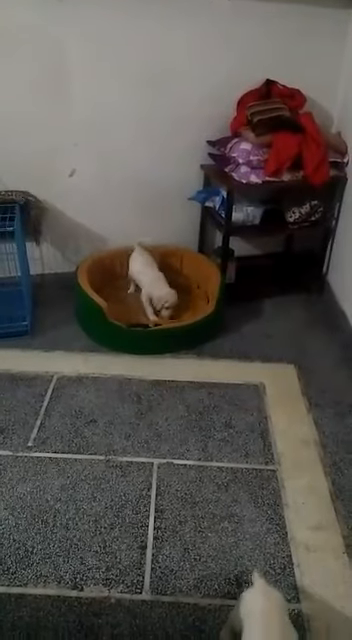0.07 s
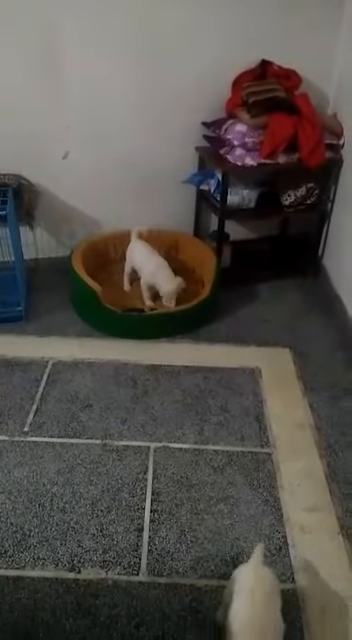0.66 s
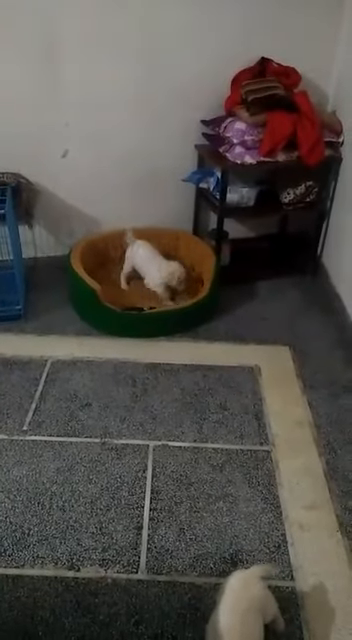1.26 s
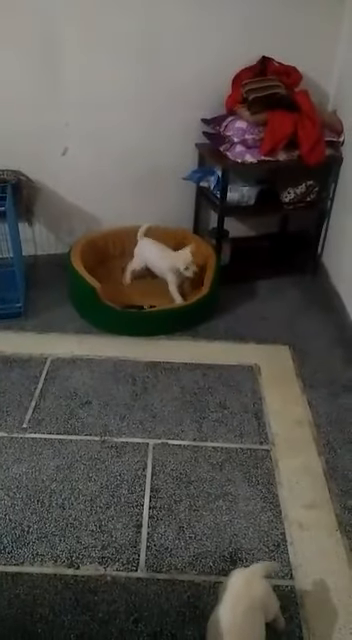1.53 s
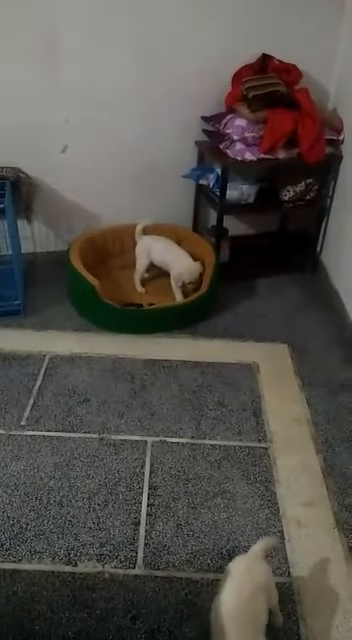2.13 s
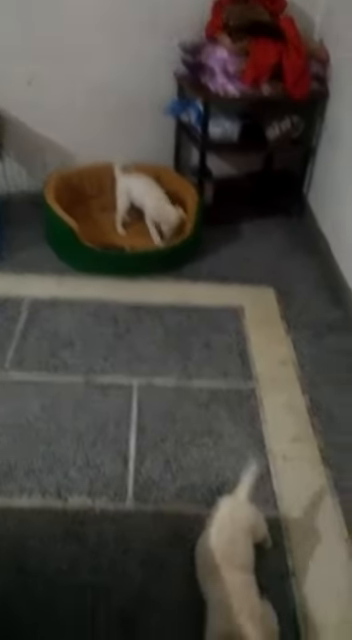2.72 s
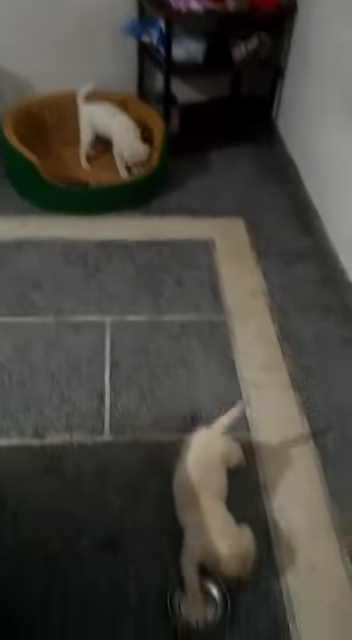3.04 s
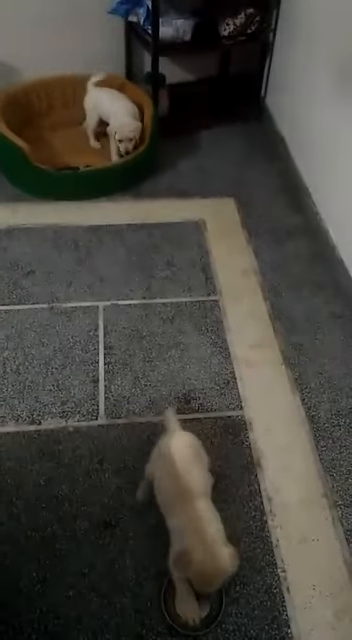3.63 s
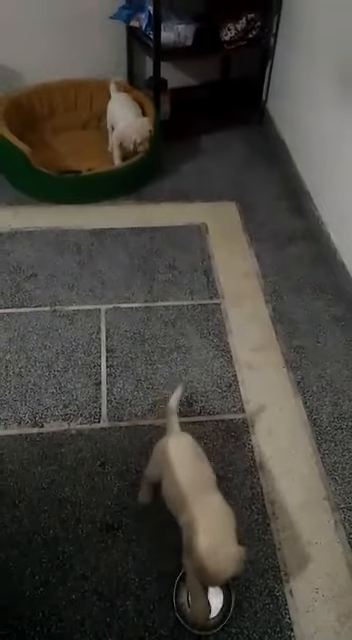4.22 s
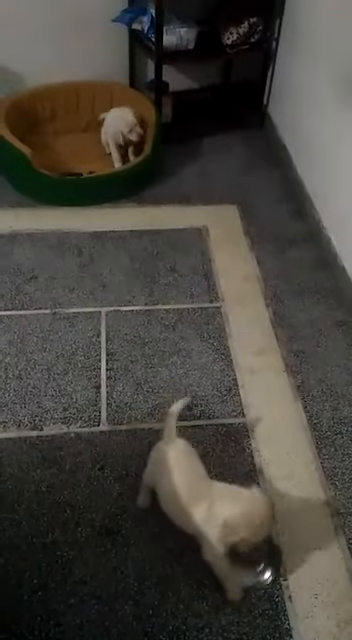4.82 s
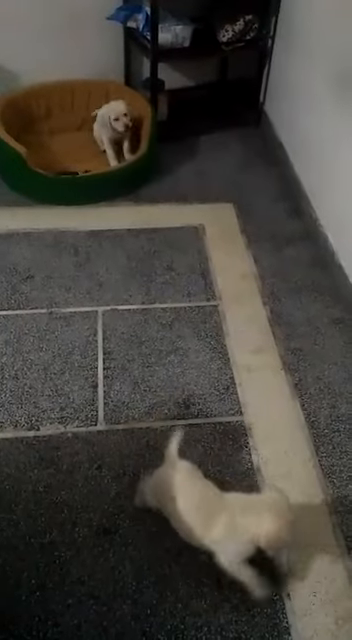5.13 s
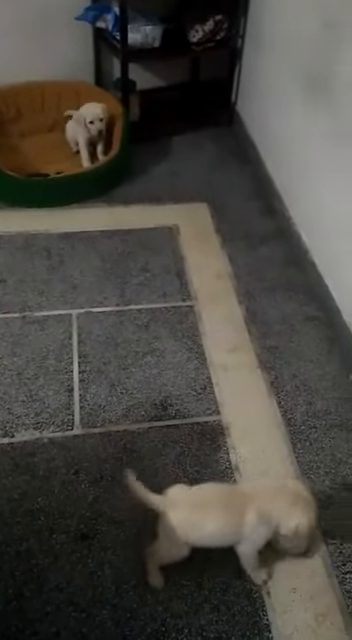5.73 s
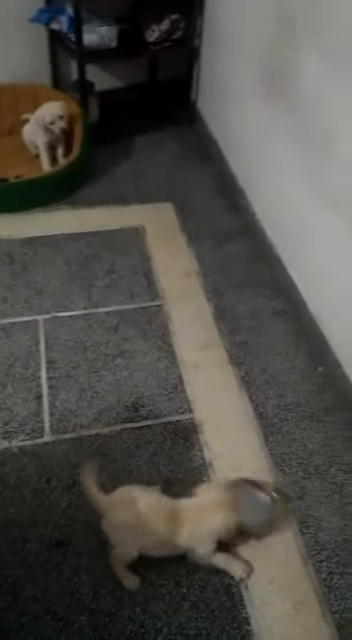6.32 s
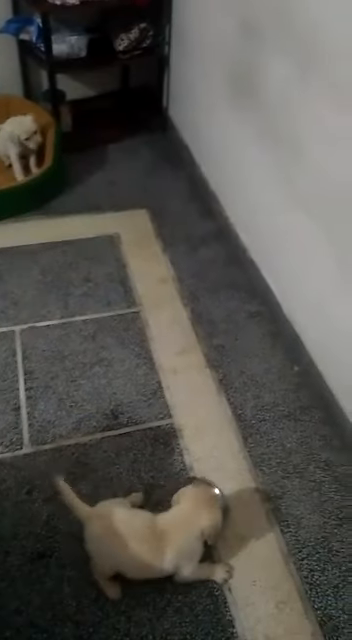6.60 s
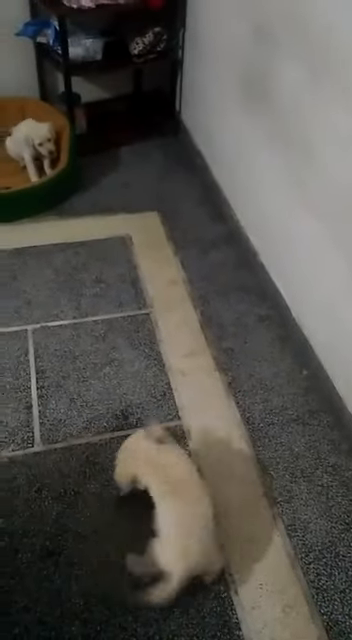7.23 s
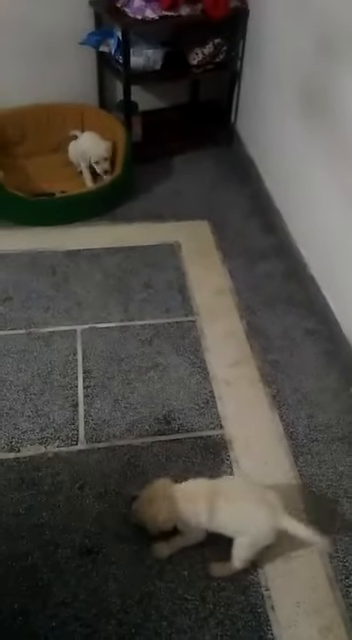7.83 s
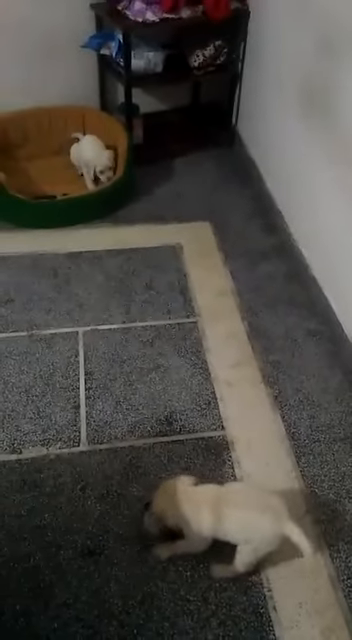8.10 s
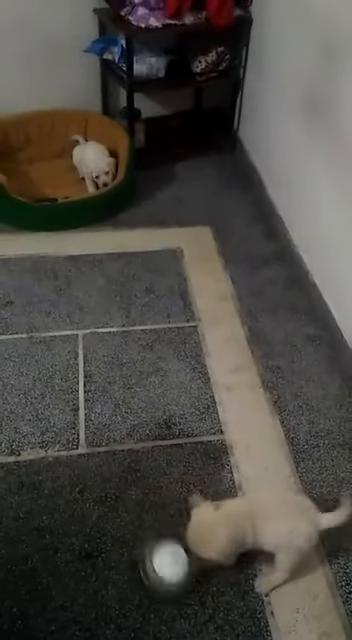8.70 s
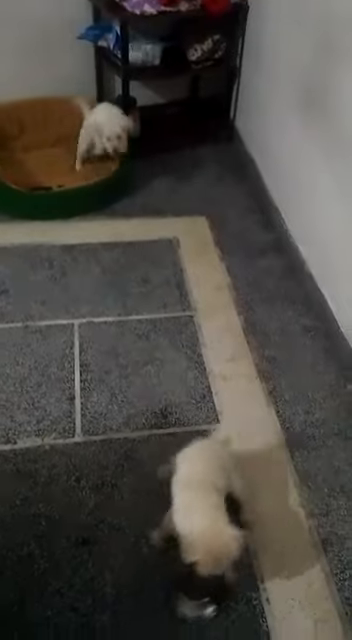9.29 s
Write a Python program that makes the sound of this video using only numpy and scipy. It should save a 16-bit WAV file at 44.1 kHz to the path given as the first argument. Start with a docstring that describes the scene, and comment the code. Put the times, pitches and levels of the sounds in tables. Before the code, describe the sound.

A puppy's claws scratch on a mat, then a thin steel bowl scrapes, clatters and rings across a tiled floor.

```python
"""Puppy and steel bowl

A puppy scuffs and scratches on a mat, then noses and paws a thin steel bowl over a tiled floor.
Friction makes the mat hiss and drives the bowl as it judders, drags and sings. Impacts of the rim
excite the ringing modes of its wall, and the air in it gives a hollow note.
A small hard room reverberates; the sound is heard from a step away, nearly mono."""
import sys
import numpy as np
from scipy import signal
from scipy.fft import rfft, irfft, next_fast_len
from scipy.io import wavfile
from scipy.ndimage import uniform_filter1d, map_coordinates

SR = 44100
rng = np.random.default_rng(int(sys.argv[2]) if len(sys.argv) > 2 else 0)


def int16_out(signal):
    """Quantize to a 16-bit WAV file."""
    q = np.round(np.clip(np.atleast_2d(signal).T, -1, 1) * 32767)
    wavfile.write(sys.argv[1], SR, q.astype(np.int16))


N = 421155
T = np.arange(int(SR * 0.8)) / SR  # time axis of one impulse response, t/s


def amp(db):
    """Amplitude ratio of a level in decibels."""
    return 10 ** (np.asarray(db) / 20)


def rms(x):
    """Root mean square."""
    return np.sqrt(np.mean(x ** 2) + 1e-20)


def along(points, hz):
    """Interpolation of (f/Hz, value) points on a logarithmic frequency axis."""
    f, values = np.transpose(points)
    return np.interp(np.log(hz + 1), np.log(f + 1), values)


def add(track, start, sound):
    """Superposition: a sound joins the track at a start time in seconds."""
    part = track[round(start * SR):][:len(sound)]
    part += sound[:len(part)]


def filtered(x, response):
    """Linear filtering: the spectrum is multiplied by a frequency response."""
    size = next_fast_len(x.shape[-1] + 8192)
    hz = np.fft.rfftfreq(size, 1 / SR)
    return irfft(rfft(x, size) * response(hz), size)[..., :x.shape[-1]]


def coloured(x, spectrum):
    """Spectral shaping by (f/Hz, level/dB) points, at unit rms."""
    y = filtered(x, lambda hz: amp(along(spectrum, hz)))
    return y / rms(y)


def burst(spectrum, t60):
    """Exponential decay of noise, 60 dB in t60 seconds, at unit energy."""
    y = coloured(rng.standard_normal(len(T)), spectrum) * amp(-60 * T / t60)
    return y / np.linalg.norm(y)


def grains(per_s, spread_db):
    """Shot noise: tiny slips of random time, size and sign, at unit rms."""
    slips = rng.random(N) < per_s / SR
    sizes = amp(spread_db * rng.standard_normal(N).clip(-2, 2))
    y = slips * sizes * rng.choice([-1, 1], N)
    return y / rms(y)


def gesture_db(t, length, attack, sag, release):
    """Envelope of a push: a linear rise (attack/s), then exponential decay (sag and release in dB/s)."""
    rise = np.clip(t / attack, 1e-6, 1)
    return 20 * np.log10(rise) - sag * np.clip(t, 0, length) - release * np.maximum(t - length, 0)


def efforts(rows, **envelope):
    """Incoherent addition: overlapping pushes sum in power, giving one gain curve per level column."""
    t = np.arange(N) / SR
    power = sum(np.outer(amp(levels), amp(gesture_db(t - start, length, **envelope))) ** 2
                for start, length, *levels in rows)
    return np.sqrt(power)


def tones(rows, attack, sag, release_at_1khz, waver):
    """Random frequency modulation makes held notes waver; damping grows with frequency."""
    out, t = np.zeros(N), np.arange(SR) / SR
    for start, length, hz, db in rows:
        drift = map_coordinates(rng.standard_normal(62), [t * 60])
        pitch = hz * (1 + waver * drift)
        note = np.sqrt(2) * np.sin(2 * np.pi * np.cumsum(pitch) / SR)
        release = release_at_1khz * np.sqrt(hz / 1000)
        add(out, start, note * amp(db + gesture_db(t, length, attack, sag, release)))
    return out


# reverberation time of the room: f/Hz, T60/s
REVERB_TIMES = [(150, 1), (800, 0.51), (2000, 0.6), (6000, 0.55), (14000, 0.18)]


def room(x, wet_db):
    """Reverberation: a diffuse tail, different from spot to spot, follows the direct sound."""
    hz, t, noise = signal.stft(rng.standard_normal(len(T)), SR, nperseg=256)
    decay = amp(-60 * t / along(REVERB_TIMES, hz)[:, None])
    tail = signal.istft(noise * decay, SR, nperseg=256)[1][:len(T)]
    tail *= 1 - np.exp(-T / 0.0032)
    return x + amp(wet_db) * signal.fftconvolve(x, tail / np.linalg.norm(tail))[:len(x)]


# spectrum of the room noise: f/Hz, relative level/dB
AMBIENT_SPECTRUM = [(15, -56), (25, -32.5), (60, -1), (219, -16), (257, -15), (427, -11.5), (573, -38),
                    (637, -6.5), (856, -12), (15000, -37)]
# faint background tones: t/s, duration/s, f/Hz, level/dB
AMBIENT_TONES = [(1.1, .2, 682, -74.5), (3.05, .35, 295, -78), (3.14, .33, 850, -67.5)]


def background():
    """Ambient noise: a faint, steady continuous spectrum with a few wavering tones in it."""
    noise = amp(-80) * coloured(rng.standard_normal(N), AMBIENT_SPECTRUM)
    return noise + tones(AMBIENT_TONES, attack=0.06, sag=5, release_at_1khz=90, waver=0.012)


def patchy(x, depth_db, bin_count, frame_count):
    """Spectral modulation: the colour of rubbing shifts as the point of contact moves."""
    spectra = signal.stft(x, nperseg=512)[2]
    field = uniform_filter1d(rng.standard_normal(spectra.shape), bin_count, axis=0)
    field = uniform_filter1d(field, frame_count, axis=1)
    y = signal.istft(spectra * amp(depth_db * field / rms(field)), nperseg=512)[1][:N]
    return y / rms(y)


# spectra of claws and of pads on the mat: f/Hz, relative level/dB
CLAW_SPECTRUM = [(1650, -63), (2800, -28.5), (3630, -27), (4210, -11.5), (4740, -13), (5940, -0.5),
                 (7030, -3.5), (7970, -3), (8320, 5.5), (8670, 3.5), (14100, -13), (14700, -27),
                 (15000, -43)]
PAD_SPECTRUM = [(120, -69), (200, -60), (297, -14), (364, -28.5), (446, -12), (678, -13.5), (1060, -1.5),
                (1410, -1), (1810, 3), (3500, -28.5), (4550, -58), (7700, -120)]
# paw strokes: t/s, duration/s, scratch level/dB, rub level/dB
PAW_STROKES = [(.13, .12, -69, -77), (.465, 0.06, -49.5, -62.5), (.645, 0.035, -53, -61.5),
               (.85, 0.036, -42.5, -40), (1.035, 0.02, -43.5, -53.5), (1.22, 0.24, -54, -60),
               (1.51, 0.072, -51.5, -59.5), (1.91, 0.078, -47, -57.5), (2.07, 0.017, -52.5, -60),
               (2.21, 0.02, -55, -62.5), (2.475, 0.44, -45, -54.5), (2.66, 0.04, -36, -43.5),
               (2.79, 0.27, -40.5, -48.5), (3.09, 0.13, -46.5, -48), (3.405, 0.075, -43.5, -50),
               (3.54, 0.16, -41.5, -50.5), (3.74, 0.064, -53, -52), (3.92, 0.087, -41, -50.5),
               (4.12, 0.022, -57, -86)]


def scuffs():
    """Friction noise: fibres catch on claws and hiss; the pads rub lower down and linger longer."""
    scratch = efforts(PAW_STROKES, attack=0.027, sag=25, release=194)[0]
    rub = efforts(PAW_STROKES, attack=0.027, sag=25, release=118)[1]
    fibres = coloured(grains(per_s=3000, spread_db=0), CLAW_SPECTRUM)
    fibres = patchy(fibres, depth_db=3.5, bin_count=5, frame_count=14)
    pads = coloured(grains(per_s=1900, spread_db=-0.5), PAD_SPECTRUM)
    pads = patchy(pads, depth_db=4, bin_count=4, frame_count=20)
    return room(scratch * fibres + rub * pads, wet_db=-16)


# claw ticks: t/s, relative level/dB
CLAW_TICKS = [(0.5036, -26), (0.6566, -23), (0.9393, -27), (1.01, -36), (1.302, -36.5), (1.353, -27.5),
              (1.4093, -30), (1.948, -28.5), (2.086, -31.5), (2.4753, -33), (2.5098, -31), (2.668, -13.5),
              (2.6872, -18.5), (2.781, -20.5), (2.833, -24.5), (3.1123, -24), (3.1978, -26.5),
              (3.6685, -34), (3.7598, -26), (3.851, -32), (3.901, -29), (3.9237, -15.5), (3.9442, -23),
              (3.9704, -21), (4.651, -26.5)]


def claws():
    """Sudden release: a snagged claw lets go with a brief broadband transient."""
    out = np.zeros(N)
    for start, db in CLAW_TICKS:
        add(out, start, amp(db + 9.5) * room(burst(CLAW_SPECTRUM, t60=0.043), wet_db=-4))
    return out


# blows of paws and muzzle: t/s, relative level/dB, centre f/Hz
PADDED_BLOWS = [(0.656, -38.5, 890), (0.868, -18, 1770), (0.882, -30, 1970), (1.96, -35, 1260),
                (2.09, -42, 1310), (2.25, -50, 1350), (3.122, -20, 1110), (3.922, -26.5, 1000),
                (4.352, -41.5, 1280), (4.571, -18.5, 1140), (4.739, -53, 1240), (7.945, -13.5, 1150)]


def knocks():
    """Heavy damping: a padded blow sounds one broad, short-lived resonance."""
    out = np.zeros(N)
    for start, db, hz in PADDED_BLOWS:
        peak = [(hz / 7, -52), (hz / 3, -23), (hz / 2, -16), (hz, 0), (hz * 1.3, -7), (hz * 1.9, -30)]
        add(out, start, amp(db + 6) * room(burst(peak, t60=0.089), wet_db=-6.5))
    return signal.sosfilt(signal.butter(2, 330, "high", fs=SR, output="sos"), out)


# a paw leans on the bowl: t/s, duration/s, initial f/Hz, level/dB
PAW_LEANS = [(3.95, 0.056, 1255, -37), (4.13, .04, 1240, -52), (4.328, 0.16, 1153, -41.5),
             (4.549, .03, 1080, -36), (4.723, .17, 1243, -36)]


def judder():
    """Intermittent contact: each hop of the rim sounds a resonance that sinks as the weight comes on."""
    out = np.zeros(N)
    hop_s, fall_hz_per_s = 0.015, 480
    for start, length, start_hz, db in PAW_LEANS:
        gaps = hop_s * np.exp(0.16 * rng.standard_normal(24))
        for t in np.cumsum(gaps):
            hz = (start_hz - fall_hz_per_s * min(t, length)) * np.exp(0.042 * rng.standard_normal())
            hop = np.sin(2 * np.pi * hz * T) * amp(-60 * T / 0.033) * (1 - np.exp(-T / 0.0013))
            weight_db = gesture_db(t, length, attack=0.0064, sag=27, release=193)
            add(out, start + t, amp(db + weight_db + rng.normal(0, 3.1)) * hop)
    return room(out, wet_db=-2)


def ring(modes, scatter_db):
    """Modal superposition at unit energy; each contact point drives the damped modes differently."""
    y = np.zeros(len(T))
    for hz, db, t60 in modes:
        decay = amp(db + rng.normal(0, scatter_db) - 60 * T / t60)
        y += decay * np.sin(2 * np.pi * (hz * T + rng.random()))
    return y / np.linalg.norm(y)


# how firmly the bowl is pressed to the floor: t/s, share (0 to 1)
FLOOR_CONTACT = [(5.6, 0.9), (5.85, 0.13), (6.45, 0), (6.6, 0.57), (8.0, 0.95), (8.2, 0), (8.85, 0),
                 (9.0, 0.31)]
# modes of the steel wall: f/Hz, relative level when free/dB, relative level when pressed/dB
WALL_MODES = [(794.5, -20.5, -4.5), (1048, -16.5, -4), (1186, -20.5, -8.5), (1310, -15.5, -10.5),
              (1393, -18, -12), (1906, -5.5, -4), (2500, -13, -12.5), (2605, -12.5, -30.5),
              (3422, -21, -21), (3690, -17.5, -21.5), (3690, -14, -26.5), (4150, -6, -25), (4315, -10, -26),
              (4890, -13.5, -43.5), (5166, -10.5, -31), (5320, -4.5, -26), (5903, -1.5, -14),
              (6010, -8, -16), (6600, -6.5, -8.5), (7180, -18.5, -21.5), (7550, -20, -20.5), (7760, -4, -4),
              (8830, 8, -7), (8000, -14, -13.5), (8480, 5.5, -5.5), (9510, 0, -13), (9330, 5, -9.5),
              (9440, -4.5, -23.5), (10700, -15, -4), (10730, -6, -7.5)]
# low resonances of the bowl on the floor: f/Hz, relative level/dB, T60/s
HOLLOW_MODES = [(456.5, -22.5, 0.11), (589, -15.5, 0.11), (641.4, -19.5, 0.2), (716, -10.5, 0.063),
                (747, 4, 0.11), (780.9, -4, 0.085)]


def bowl(t, wall_db, hollow_db, crack_db, t60_at_1khz, clash_t60):
    """Impulse response of the bowl at time t: wall modes, hollow note, a dense clash and a short crack."""
    pressed = np.interp(t, *np.transpose(FLOOR_CONTACT))
    modes = [(hz, free_db + pressed * (held_db - free_db), t60_at_1khz * (1000 / hz) ** 0.56)
             for hz, free_db, held_db in WALL_MODES]
    wall = amp(wall_db) * ring(modes, scatter_db=4.5)
    hollow = amp(hollow_db) * ring(HOLLOW_MODES, scatter_db=5)
    return wall + hollow + clash(clash_t60) + amp(crack_db) * clash(t60=0.054)


# noisy part of the bowl's response: f/Hz, relative level/dB
CLASH_SPECTRUM = [(180, -57.5), (300, -31), (658, -40), (775, -2.5), (884, -47.5), (1020, -4), (1910, -4),
                  (3120, -27.5), (4180, -26.5), (6510, -14.5), (8740, -2), (12900, -15.5), (14300, -23),
                  (15000, -54)]


def clash(t60):
    """Broadband excitation: a contact gives decaying noise beside the distinct modes."""
    return burst(CLASH_SPECTRUM, t60)


def registers(x):
    """Radiation in four bands (treble, chime, clang, hollow note); so small a shell gives little bass."""
    bands_hz = [(5000, 16000), (2800, 5000), (900, 2800), (430, 900)]
    return [signal.sosfilt(signal.butter(4, band, "band", fs=SR, output="sos"), x) for band in bands_hz]


# chime band against the mean of treble and clang: t/s, relative level/dB
CHIME_BALANCE = [(4.9, -11.5), (5.25, -4.5), (5.9, -11.5), (6.1, -4), (6.65, -12.5), (7.5, -3.5),
                 (7.6, -11.5), (8.5, -9), (9.0, -15.5)]


def chime_db(t):
    """Spectral balance: the chime band swells and fades as the bowl turns."""
    return np.interp(t, *np.transpose(CHIME_BALANCE))


# shoves of the bowl: t/s, duration/s, treble level/dB, clang level/dB, hollow level/dB
BOWL_SHOVES = [(4.31, 0.068, -53.5, -85, -64.5), (4.41, 0.034, -46.5, -73, -62),
               (4.55, 0.024, -45.5, -55, -71), (4.73, 0.15, -43.5, -66, -66),
               (4.8, 0.068, -37.5, -45.5, -47), (4.86, 0.084, -28, -39, -39.5),
               (5.02, 0.3, -41.5, -46.5, -72), (5.32, 0.14, -45.5, -59, -54.5),
               (5.5, 0.092, -48, -53.5, -50.5), (5.68, 0.1, -51.5, -75, -61.5), (5.78, .07, -44, -61, -55),
               (5.845, 0.066, -39.5, -41.5, -44), (5.94, 0.18, -32, -29.5, -51),
               (6.165, 0.067, -36, -33, -44), (6.33, 0.021, -41.5, -47, -68), (6.64, 0.12, -35, -40.5, -39),
               (6.91, 0.16, -42.5, -50, -50.5), (7.055, 0.071, -41, -57, -54),
               (7.14, 0.094, -44, -62, -56.5), (7.46, .09, -25.5, -54, -48),
               (7.555, 0.092, -23.5, -23.5, -28), (7.935, 0.044, -58, -48, -47.5),
               (8.14, 0.22, -42, -47.5, -60.5), (8.33, 0.097, -39.5, -38.5, -41.5),
               (8.495, 0.014, -34, -27.5, -56), (8.69, 0.1, -35.5, -41.5, -54),
               (9.015, 0.12, -41, -37.5, -52), (9.16, 0.027, -37, -55, -53), (9.34, 0.13, -60, -89, -88)]


def drag():
    """Stick-slip friction: the rim catches on grit and drives a response that changes as the bowl turns."""
    treble, clang, hollow = efforts(BOWL_SHOVES, attack=0.014, sag=33.5, release=143.5)
    chime = amp(chime_db(np.arange(N) / SR) - 4) * np.sqrt(treble * clang)  # weaker than in a hit
    forces = np.array([treble, chime, clang, hollow]) * grains(per_s=1200, spread_db=6)
    out, step = np.zeros(N), SR // 8
    for first in range(round(BOWL_SHOVES[0][0] * SR), N, step):
        t = first / SR
        response = bowl(t, wall_db=1, hollow_db=-4, crack_db=-1.5, t60_at_1khz=0.24, clash_t60=0.086)
        bands = np.array([band / np.linalg.norm(band) for band in registers(room(response, wet_db=-9))])
        add(out, t, signal.fftconvolve(forces[:, first:first + step], bands, axes=1).sum(0))
    return out


# hits on the tiles: t/s, treble level/dB, clang level/dB, hollow level/dB, crack re clash/dB
RIM_HITS = [(4.8698, -29.5, -42, -36.5, -13), (4.9352, -31, -38, -47, 2), (4.9565, -29, -38, -66, 10),
            (5.1865, -36, -50, -53, 17), (5.2654, -28, -48.5, -44, 12.5), (5.8512, -45, -51.5, -42, 7),
            (5.9065, -28.5, -34.5, -29.5, -13), (5.9318, -22.5, -36, -39, 7), (5.944, -28.5, -34, -49, -4),
            (5.9544, -25, -30.5, -45, -6), (6.0489, -26, -40.5, -54, 6), (6.1659, -23, -29.5, -36.5, -1.5),
            (6.1913, -28.5, -32.5, -61, -8), (6.6032, -49.5, -120, -51, 7), (6.6498, -28, -31.5, -32, 6),
            (7.0638, -39, -56, -55, -18), (7.4596, -26.5, -42, -57, -12), (7.4778, -27.5, -37, -40.5, 10),
            (7.5229, -26, -31, -35, -7), (7.5667, -18.5, -25, -32, 6), (7.5874, -20, -26, -32.5, 2),
            (7.6456, -25, -22.5, -38, 5), (8.335, -42, -35, -49, -19.5), (8.5018, -22.5, -25, -41, 1),
            (8.5217, -24, -27, -43, 0.5), (8.6951, -32, -33.5, -47, 11.5),
            (8.855, -38.5, -63.5, -45.5, 26.5), (9.018, -18, -28, -30.5, 2.5), (9.0532, -47, -40, -63, 36),
            (9.3526, -49.5, -83, -76, 8), (9.3704, -44, -80, -80, 16)]


def clatter():
    """Impact excitation: hard hits ring brightly, soft flat ones sound hollow, heavy ones thump the floor."""
    out, onset = np.zeros(N), SR // 50
    heavy_hit_db = -25
    for t, treble_db, clang_db, hollow_db, crack_db in RIM_HITS:
        hit = bowl(t, wall_db=4, hollow_db=-3.5, crack_db=crack_db, t60_at_1khz=0.3, clash_t60=0.18)
        bands = registers(room(hit, wet_db=-3.5))
        levels = [treble_db, (treble_db + clang_db) / 2 + chime_db(t), clang_db, hollow_db]
        add(out, t, sum(amp(db) * band / rms(band[:onset]) for band, db in zip(bands, levels)))
        thump = burst([(30, -9), (120, -0.5), (400, 5), (1000, -56)], t60=0.32)
        weight_db = (2 * clang_db + hollow_db) / 3
        add(out, t, amp(-21 + 1.4 * (weight_db - heavy_hit_db)) * thump)
    return out


# notes of the sliding rim: t/s, duration/s, f/Hz, level/dB
RIM_NOTES = [(4.87, 0.077, 5378, -37.5), (4.97, .33, 1042, -48), (5.53, .07, 752, -49.5),
             (5.852, 0.13, 791, -32), (6.05, 0.2, 4155, -42.5), (6.66, 0.057, 797, -35),
             (6.91, .3, 777.5, -51), (7.62, .08, 1042, -31.5), (7.94, 0.05, 1185, -43)]


def singing():
    """Self-excited vibration: friction feeds one mode of the wall, which rings on when the rim lets go."""
    return tones(RIM_NOTES, attack=0.025, sag=10, release_at_1khz=115, waver=0.0072)


def scene():
    """Superposition of all sources; decorrelation spreads only the treble a little to the sides."""
    mid = clatter() + drag() + singing() + judder() + scuffs() + claws() + knocks() + background()
    diffuse = signal.fftconvolve(mid, burst([(100, 0.028), (15000, 0.018)], t60=0.04))[:N]
    side_gain_db = [(3000, -82.5), (4600, -50.5), (9000, -21), (13000, -17.5)]
    side = filtered(diffuse, lambda hz: amp(along(side_gain_db, hz)))
    return np.array([mid + side, mid - side])


def record(dry):
    """Band limiting: a steep low-pass removes the highest treble."""
    cutoff_hz = 14400
    return filtered(dry, lambda hz: 1 / np.sqrt(1 + (hz / cutoff_hz) ** 240))


dry = scene()
out = record(dry)
int16_out(out)
```